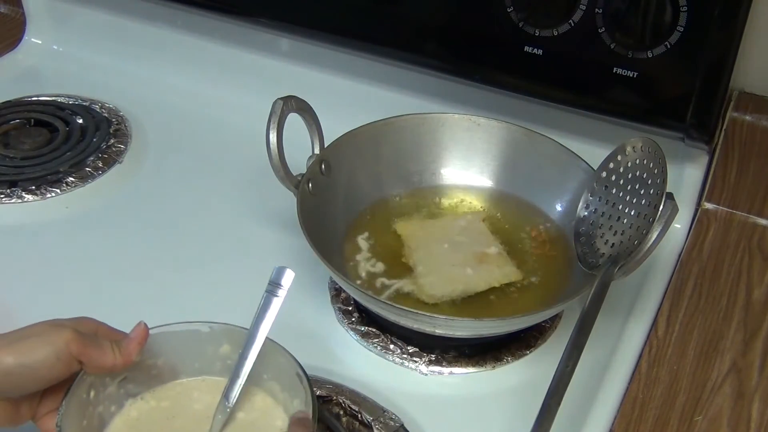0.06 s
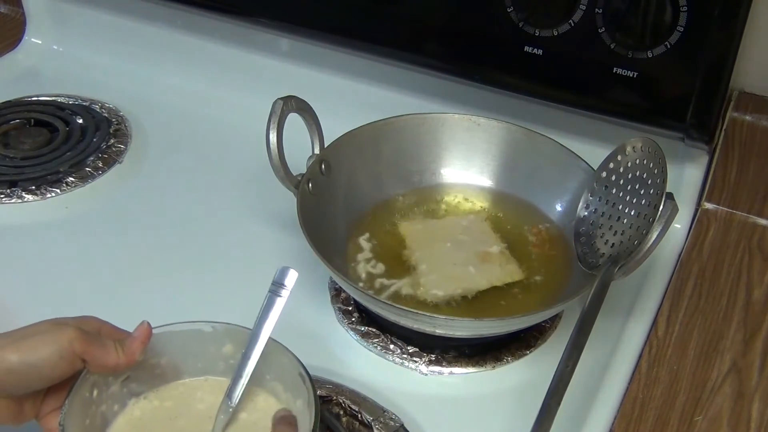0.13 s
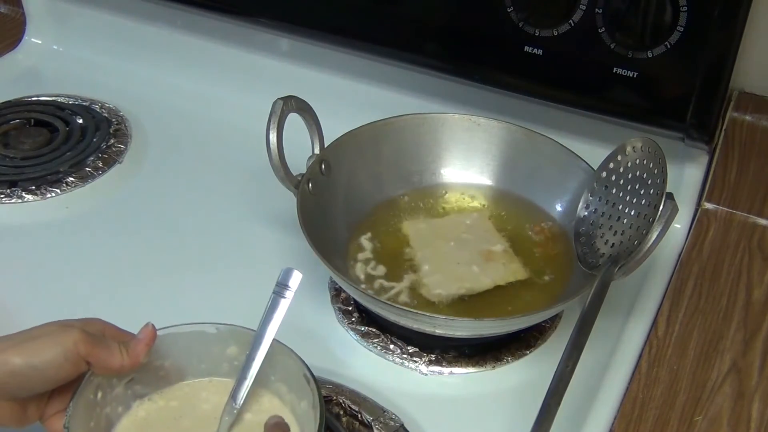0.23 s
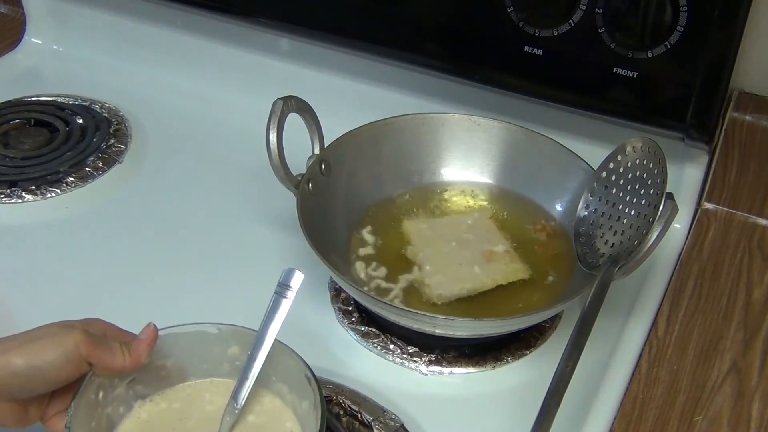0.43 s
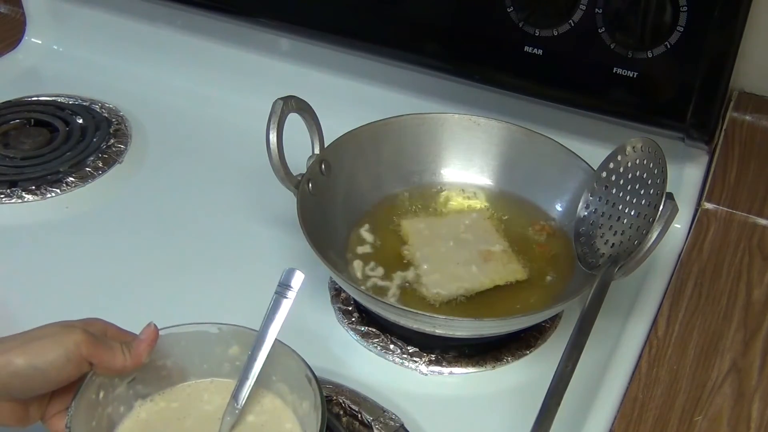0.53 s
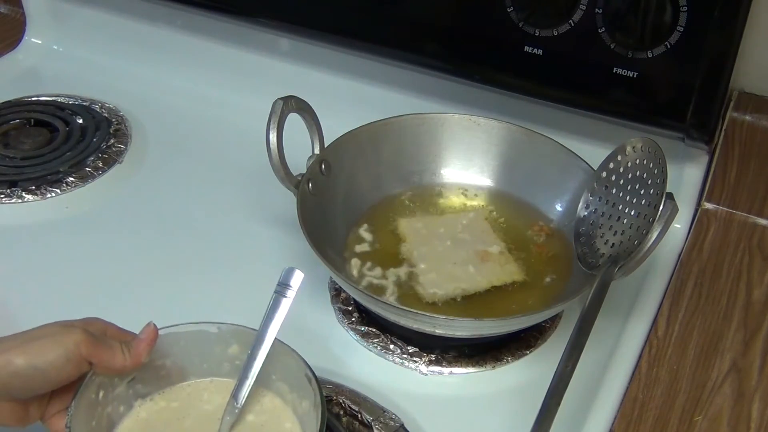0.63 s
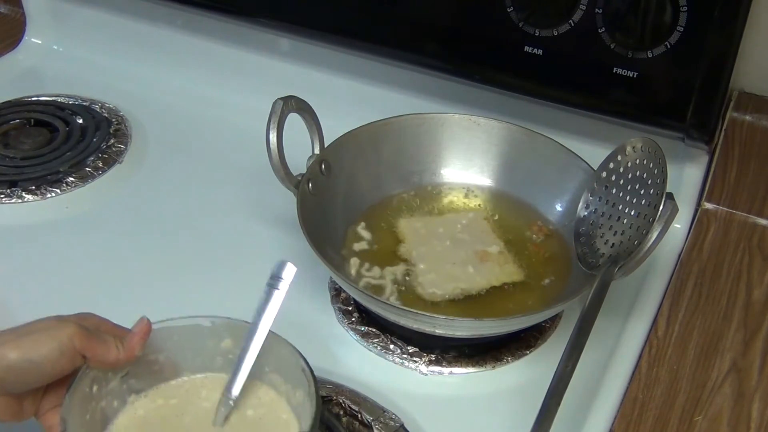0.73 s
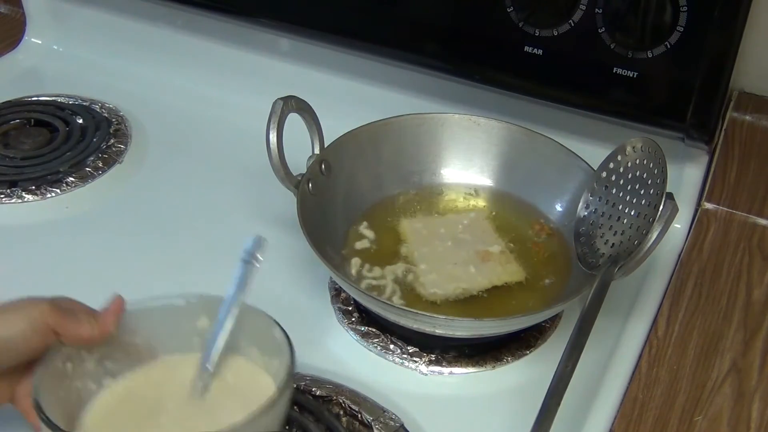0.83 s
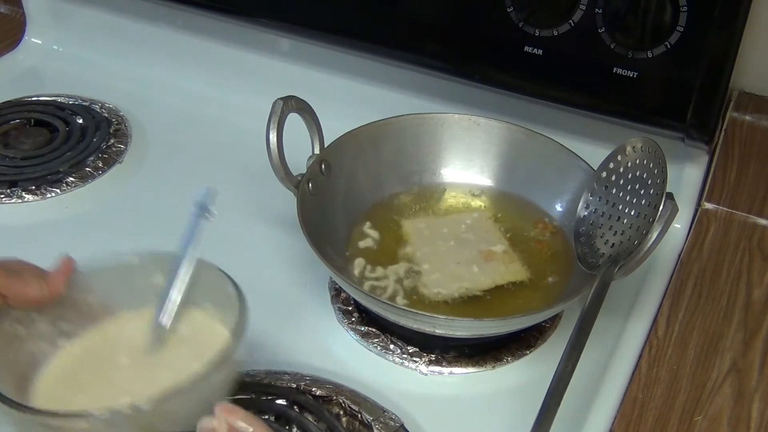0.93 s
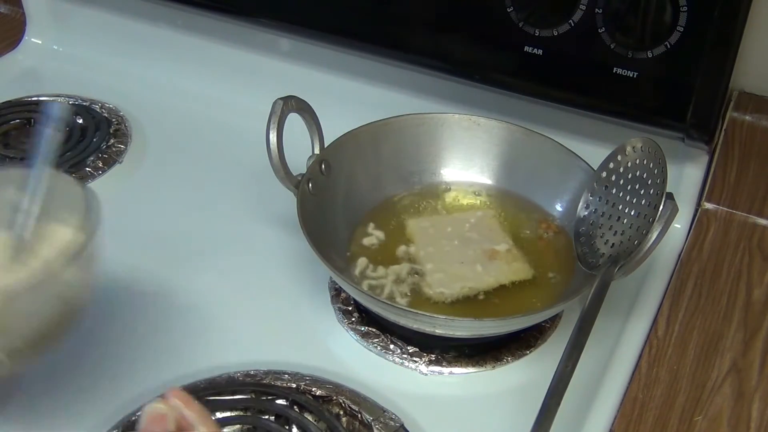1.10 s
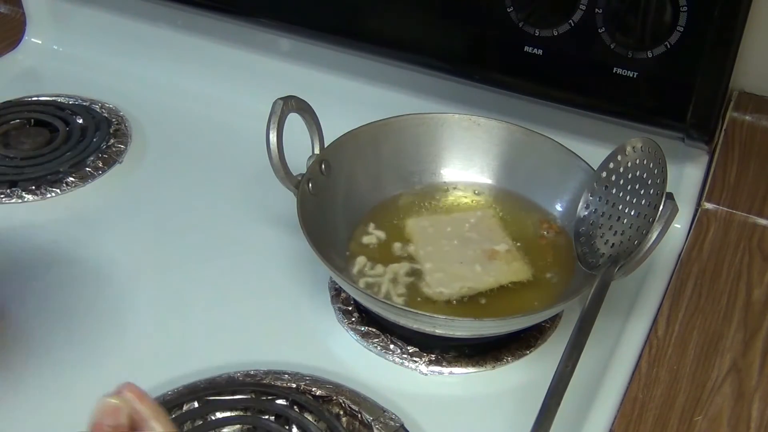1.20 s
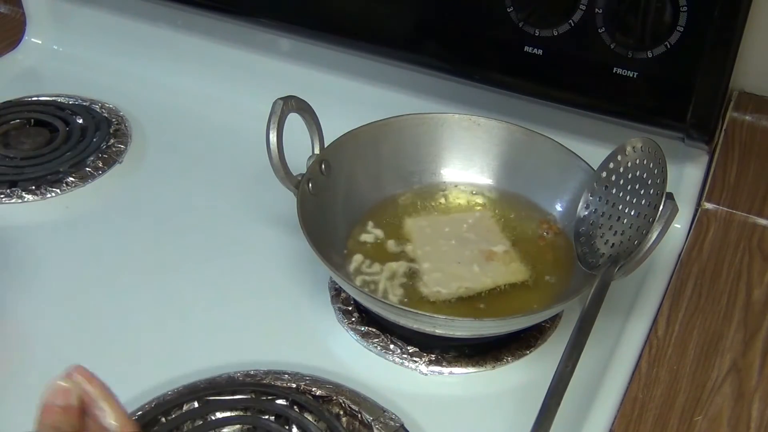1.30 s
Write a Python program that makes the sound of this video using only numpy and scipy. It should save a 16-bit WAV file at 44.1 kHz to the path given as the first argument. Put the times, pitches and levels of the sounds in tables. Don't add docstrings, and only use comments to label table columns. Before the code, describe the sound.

Battered food sizzling in hot oil, with a sharp utensil clatter ringing in a small kitchen

```python
import sys
import numpy as np
from scipy import signal
from scipy.fft import rfft, irfft, next_fast_len
from scipy.io import wavfile
from scipy.ndimage import uniform_filter1d

SR = 44100
rng = np.random.default_rng(int(sys.argv[2]) if len(sys.argv) > 2 else 0)


def waveform_to_disk(signal):
    frames = np.transpose(np.atleast_2d(signal))
    scaled = np.clip(frames, -1, 1) * 32767
    samples = np.round(scaled).astype(np.int16)
    wavfile.write(sys.argv[1], SR, samples)


def field_ratio(decibels):
    return 10 ** (np.asarray(decibels, dtype=float) / 20)


N = 59535
T = np.arange(N) / SR
PAD = next_fast_len(N + 8192)
HZ = np.maximum(np.arange(PAD // 2 + 1) * SR / PAD, 1)

# time in seconds, level in dB.
FIZZ_VIGOUR = [(0, -44.5), (.03, -56.5), (.05, -47.5), (.12, -49), (.17, -47), (.22, -45.5), (.45, -43.5),
               (.53, -48.5), (.6, -51), (.69, -52.5), (.76, -50), (.9, -50.5), (1.05, -52), (1.13, -47),
               (1.165, -48.5), (1.21, -46), (1.26, -46), (1.35, -47.5)]
# time in seconds, level in dB.
SEETHE_VIGOUR = [(0, -59), (.05, -55), (.12, -53.5), (.2, -57.5), (.45, -53), (.55, -52.5), (.63, -55),
                 (.7, -58), (.8, -60), (.87, -55), (1.0, -57), (1.1, -56), (1.13, -56), (1.22, -54.5),
                 (1.29, -54.5), (1.35, -55)]
# frequency in Hz, strength in dB per Hz.
FIZZ_COLOUR = [(4000, -54), (5200, -29.5), (5700, -14.5), (7000, -3), (7900, 1), (8700, -4.5), (9500, -13),
               (10500, -23)]
# frequency in Hz, strength in dB per Hz.
SEETHE_COLOUR = [(24, -54), (40, -24.5), (310, -8), (355, -6.5), (651, -11.5), (1500, -52), (1950, -84),
                 (3300, -120)]
# frequency in Hz, left minus right in dB.
PAN_BALANCE = [(60, 6.51), (150, 4.38), (380, -2.5), (940, -6.0), (2360, -1.5), (5920, -4.5), (14800, -4.0)]
# frequency in Hz, likeness from 0 to 1.
PAN_LIKENESS = [(60, 0.68), (180, 0.75), (540, 0.87), (1640, 0.57), (4930, 0.97), (14800, 1)]
# start in seconds, peak in dB, pitch in Hz.
SPITS = [(0.0124, -38, 7900), (0.0421, -36, 7600), (0.0752, -38.5, 7600), (0.1531, -29.5, 7760),
         (0.1765, -31, 8960), (0.2116, -32.5, 8200), (0.5919, -36.5, 7000), (0.7058, -41, 7910),
         (0.798, -35, 8010), (0.8809, -44, 7960), (1.0256, -36.5, 8000), (1.057, -38.5, 7440),
         (1.0856, -20, 8200), (1.1962, -31.5, 7940)]
# start in seconds, peak in dB, pitch in Hz, length in seconds.
GLUGS = [
    (0.102, -47.5, 313.1, 0.036),
    (0.609, -50.5, 305, 0.054),
    (0.921, -52.5, 320, 0.094),
    (1.03, -55, 300, .05),
    (1.178, -49, 296.8, .04),
    (1.222, -48.5, 307.3, 0.056),
    (1.302, -52, 647, .04),
    (.895, -64.5, 935, 0.026),
]
# start in seconds, level in dB, length in seconds.
THUMPS = [
    (0.16, -60, 0.16),
    (.62, -70, 0.045),
    (0.836, -59.5, .08),
    (0.948, -73, .04),
    (1.12, -74, 0.059),
    (1.159, -70.5, 0.034),
]
# peak in dB, extra strength of the body in dB.
BLOWS = [
    (-10.5, -2),
    (-8, -2.5),
    (-7.5, -1),
    (-23, 7),
]
# frequency in Hz, strength in dB per Hz.
RATTLE_COLOUR = [(506, -10), (1400, -13.5), (4270, -15), (6300, -2), (7990, 6.5), (10300, -8.5),
                 (11000, -28), (12900, -33.5)]
# frequency in Hz, strength in dB per Hz.
KITCHEN_COLOUR = [(70, -17), (470, -8.5), (1340, -8.5), (1900, -5.5), (4750, -9), (7800, -4.5),
                  (10600, -21), (12900, -35.5)]
# pitch in Hz, level in dB, time to fall 60 dB in seconds.
BODY_TONES = [(374.7, -11.5, 0.5), (521.5, -5, .3), (830, -0.5, 0.12), (900, -6, .2), (1821, -10, .4),
              (1855, -10.5, .5), (2262, -9, .3), (2530, -14, .25), (5530, -11.5, 0.14), (6984, -7, .12),
              (7250, 0.5, .12), (8170, -11.5, .1), (9500, -5.5, .1), (9560, -10.5, .1)]
# frequency in Hz, time to fall 60 dB in seconds.
KITCHEN_T60 = [(100, 1.2), (400, .8), (1500, 0.67), (4000, 0.4), (8000, .6), (13000, 0.3)]
# frequency in Hz, left minus right in dB.
BLOW_BALANCE = [(60, 9), (200, 3), (500, 0), (14800, 0)]
# frequency in Hz, likeness from 0 to 1.
BLOW_LIKENESS = [(60, .6), (180, .88), (540, .96), (1500, .995), (4900, 1), (5400, .93), (9300, .97),
                 (10000, 1)]

FIZZ_LOW_HZ, FIZZ_HIGH_HZ = 5250, 10600
FIZZ_PER_S, FIZZ_SPREAD_DB, FIZZ_DB, FIZZ_FLICKER_DB = 6600, 1.5, 0, 1.3
AIR_DB, AIR_FLICKER_DB, AIR_FOLLOWS = -51.5, 2.5, 1.6
SEETHE_FLICKER_DB, SEETHE_DB = 2, 1.5
GURGLES_PER_S, GURGLE_DB, GURGLE_CYCLES = 45, -3.5, 14.0
SPIT_RISE_S, SPIT_ECHO_S, SPIT_ECHO_DB, SPIT_PAN_DB = 0.00052, 0.0056, -8, -2
SPRAY_DB, SPRAY_T60_S = -20.5, .15
THUMP_HZ, THUMP_PAN_DB = 140, 7.5
BLOW_S, CHATTER_S = [.2372, .2497, .2792, .3603], [.0102, .0135, .012, .022]
CHATTER_PER_S, CHATTER_SPREAD_DB, CHATTER_FADE_DB = 12000, 1.5, 4
CHATTER_BEAT_HZ, CHATTER_BEAT = 480, .45
CHATTER_DROP_DB, CHATTER_AFTER_T60_S = -7, .12
BODY_DB, BODY_RISE_S = -32.5, .006
TAIL_DB, TAIL_RISE_S, TAIL_FLICKER_DB = -18, .004, 1.0
TAIL_GRAIN_DB = 3
TOP_HZ = 14200
GATE_HOLDS_S, GATE_KNEE_S, GATE_SINK_DB_PER_S = 0.48, .03, 246.5
GATE_RAGGED_DB = 1.5
RUSTLE_S, RUSTLE_LENGTH_S, RUSTLE_DB = 1.2, 0.17, -90
RUSTLE_LOW_HZ, RUSTLE_HIGH_HZ = 3900, 5200
FLOOR_DB = -92
LOW_CUT_HZ, CUTOFF_HZ = 45, 15400


def rms_one(x):
    return x / np.sqrt(np.mean(x ** 2) + 1e-20)


def at_hz(points, hz):
    table_hz, values = np.array(points).T
    return np.interp(np.log(hz), np.log(table_hz), values)


def drift(rate):
    r = np.exp(-2 * np.pi * rate / SR)
    noise = rng.standard_normal(N + SR)
    return rms_one(signal.lfilter([1], [1, -2 * r, r * r], noise)[SR:])


def grains(per_s, spread_db):
    size = field_ratio(spread_db * np.minimum(rng.exponential(1, N), 5)) * rng.choice([-1, 1], N)
    return size * (rng.random(N) < per_s / SR)


def ring(clicks, hz, t60):
    r, w = field_ratio(-60 / (t60 * SR)), 2 * np.pi * hz / SR
    return signal.lfilter([0, np.sin(w)], [1, -2 * r * np.cos(w), r * r], clicks + 1e-18)


def swell(start_s, length_s):
    return np.sin(np.pi * np.clip((T - start_s) / length_s, 0, 1))


def lean_left(db):
    return field_ratio(np.array([[db / 2], [-db / 2]]))


def stereo(mid, side, colour, balance, likeness):
    alike = np.clip(at_hz(likeness, HZ), 0, 1)
    lean_db = at_hz(balance, HZ) / 2
    m = np.sqrt(1 + alike) * rfft(mid, PAD)
    s = np.sqrt(1 - alike) * rfft(side, PAD)
    gain = field_ratio(at_hz(colour, HZ))
    gain = gain / np.sqrt(2 * np.mean(gain ** 2))
    left, right = (m + s) * field_ratio(lean_db), (m - s) * field_ratio(-lean_db)
    return irfft(gain * np.array([left, right]), PAD)[:, :N]


def floor_hiss():
    hiss = field_ratio(FLOOR_DB) * (rng.standard_normal(N) + .3 * rng.standard_normal((2, N)))
    return signal.sosfilt(signal.butter(4, 8000, fs=SR, output="sos"), hiss)


def fizz_band(x):
    band = signal.ellip(6, .5, 80, [FIZZ_LOW_HZ, FIZZ_HIGH_HZ], "band", fs=SR, output="sos")
    return signal.sosfilt(band, x)


def fizz(level_db):
    swarm = field_ratio(FIZZ_FLICKER_DB * (drift(44) + 0.91 * drift(150)))
    mid, side = (swarm * rms_one(grains(FIZZ_PER_S, FIZZ_SPREAD_DB)) for _ in range(2))
    bright = fizz_band(stereo(mid, side, FIZZ_COLOUR, PAN_BALANCE, PAN_LIKENESS))
    air = signal.sosfilt(signal.butter(3, [10400, 11900], "band", fs=SR, output="sos"), mid)
    air_db = AIR_DB + AIR_FLICKER_DB * drift(6) + AIR_FOLLOWS * (level_db - level_db.min())
    return field_ratio(level_db + FIZZ_DB) * (rms_one(bright) + field_ratio(air_db) * rms_one(air))


def seethe(level_db):
    pitches = np.geomspace(220, 750, 10)
    gurgle = sum(ring(grains(GURGLES_PER_S / 10, 1.0), hz, GURGLE_CYCLES / hz) for hz in pitches)
    lumps = field_ratio(SEETHE_FLICKER_DB * drift(22))
    mid = lumps * rng.standard_normal(N) + field_ratio(GURGLE_DB - 17) * rms_one(gurgle)
    side = lumps * rng.standard_normal(N)
    low = stereo(mid, side, SEETHE_COLOUR, PAN_BALANCE, PAN_LIKENESS)
    low = signal.sosfilt(signal.butter(6, 1300, fs=SR, output="sos"), low)
    return field_ratio(level_db + SEETHE_DB) * rms_one(low)


def spits():
    blips, spray = np.zeros(N), np.zeros(N)
    for s, db, hz in SPITS:
        tone = np.sin(2 * np.pi * hz * T)
        for late, loss_db in ((0, 0), (SPIT_ECHO_S, SPIT_ECHO_DB)):
            bump = np.exp(-((T - s - late) / SPIT_RISE_S - 1.5) ** 2)
            blips += field_ratio(db + loss_db) * bump * tone
        spray += field_ratio(db + SPRAY_DB - 60 * np.maximum(T - s, 0) / SPRAY_T60_S) * (T > s)
    mid, side = spray * rng.standard_normal((2, N))
    hiss = stereo(mid, side, FIZZ_COLOUR, PAN_BALANCE, PAN_LIKENESS)
    return fizz_band(hiss) + blips * lean_left(SPIT_PAN_DB)


def glugs():
    out = np.zeros(N)
    for s, db, hz, length in GLUGS:
        out += field_ratio(db) * swell(s, length) * np.sin(2 * np.pi * hz * T)
    return out * lean_left(-2)


def thumps():
    shape = sum(field_ratio(db) * swell(s, length) for s, db, length in THUMPS)
    white = rng.standard_normal((2, N))
    band = signal.butter(2, [45, THUMP_HZ], "band", fs=SR, output="sos")
    low = signal.sosfilt(band, white[0] + .5 * white)
    return shape * rms_one(low) * lean_left(THUMP_PAN_DB)


def rattle():
    chatter = np.zeros(N)
    for s, length, (db, _) in zip(BLOW_S, CHATTER_S, BLOWS):
        contact = field_ratio(db - 10 - CHATTER_FADE_DB * np.clip((T - s) / length, 0, 1)) * (T >= s)
        after_db = CHATTER_DROP_DB - 60 * np.maximum(T - s - length, 0) / CHATTER_AFTER_T60_S
        beat = 1 + CHATTER_BEAT * np.sin(2 * np.pi * CHATTER_BEAT_HZ * (T - s))
        chatter += contact * np.where(T < s + length, 1, field_ratio(after_db)) * beat
    mid, side = (chatter * rms_one(grains(CHATTER_PER_S, CHATTER_SPREAD_DB)) for _ in range(2))
    out = stereo(mid, side, RATTLE_COLOUR, BLOW_BALANCE, BLOW_LIKENESS)
    return signal.sosfilt(signal.butter(2, 250, "high", fs=SR, output="sos"), out)


def kitchen():
    mid, side = rng.standard_normal((2, N))
    wash = rfft(stereo(mid, side, KITCHEN_COLOUR, BLOW_BALANCE, BLOW_LIKENESS), PAD)
    grain = rms_one(uniform_filter1d(rng.standard_normal(len(HZ)), size=40))
    wash = wash * field_ratio(TAIL_GRAIN_DB * grain - 0.5)
    flicker = field_ratio(TAIL_FLICKER_DB * drift(45))
    out = 0
    for hz in 32 * 2 ** np.arange(10):
        rise_s = BODY_RISE_S if hz < 5000 else TAIL_RISE_S
        power = 0
        for s, (db, body_db) in zip(BLOW_S, BLOWS):
            since = np.maximum(T - s, 0)
            blow_db = db + (body_db if hz < 5000 else 0) + TAIL_DB
            fall = field_ratio(blow_db - 60 * since / at_hz(KITCHEN_T60, hz))
            power = power + fall ** 2 * (1 - np.exp(-since / rise_s))
        octave = np.maximum(1 - np.abs(np.log2(HZ / hz)), 0)
        out = out + np.sqrt(power) * irfft(wash * octave, PAD)[:, :N]
    return flicker * out


def body():
    out = np.zeros(N)
    strikes = rng.normal(0, 2, (len(BLOWS), len(BODY_TONES)))
    for k, (hz, level_db, t60) in enumerate(BODY_TONES):
        clicks = np.zeros(N)
        for s, (db, body_db), chance_db in zip(BLOW_S, BLOWS, strikes[:, k]):
            clicks[int(s * SR)] = field_ratio(db + body_db + level_db + BODY_DB + 7 + chance_db)
        soft_clicks = uniform_filter1d(clicks, size=3, origin=-1) * 2
        out += ring(soft_clicks, hz, t60)
    return out


def clatter():
    out = rattle() + kitchen() + body()
    out = signal.sosfilt(signal.cheby2(6, 24, TOP_HZ, fs=SR, output="sos"), out)
    sink_db = GATE_SINK_DB_PER_S * GATE_KNEE_S * np.logaddexp(0, (T - GATE_HOLDS_S) / GATE_KNEE_S)
    return out * field_ratio(-sink_db + GATE_RAGGED_DB * np.tanh(sink_db / 10) * drift(15))


def rustle():
    band = signal.butter(3, [RUSTLE_LOW_HZ, RUSTLE_HIGH_HZ], "band", fs=SR, output="sos")
    hiss = rms_one(signal.sosfilt(band, rng.standard_normal((2, N))))
    return field_ratio(RUSTLE_DB) * swell(RUSTLE_S, RUSTLE_LENGTH_S) * hiss


def scene():
    floor = floor_hiss()
    pan = fizz(np.interp(T, *np.transpose(FIZZ_VIGOUR)))
    pan = pan + seethe(np.interp(T, *np.transpose(SEETHE_VIGOUR)))
    return pan + glugs() + spits() + thumps() + rustle() + clatter() + floor


def roll_off(x):
    return signal.sosfilt(signal.butter(12, 15440, fs=SR, output="sos"), x)


def record(dry):
    cut = signal.sosfilt(signal.cheby2(12, 70, CUTOFF_HZ, fs=SR, output="sos"), dry)
    cut = signal.sosfilt(signal.butter(2, LOW_CUT_HZ, "high", fs=SR, output="sos"), cut)
    return roll_off(cut)


dry = scene()
out = record(dry)
waveform_to_disk(out)
```